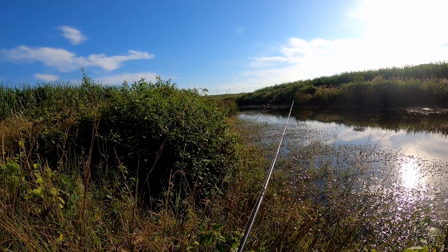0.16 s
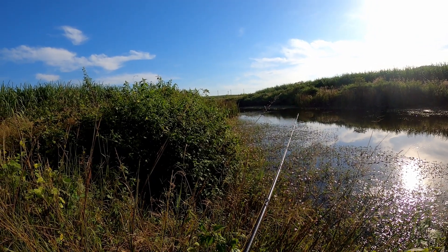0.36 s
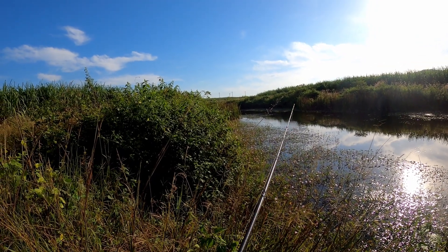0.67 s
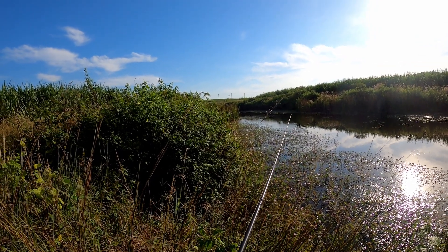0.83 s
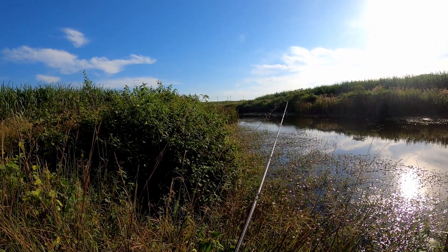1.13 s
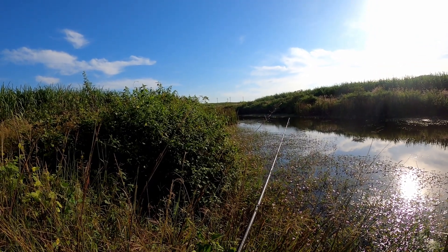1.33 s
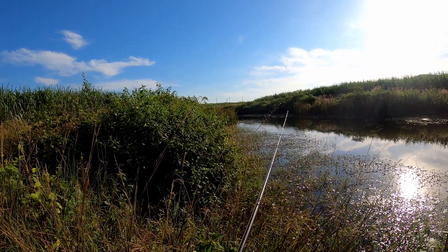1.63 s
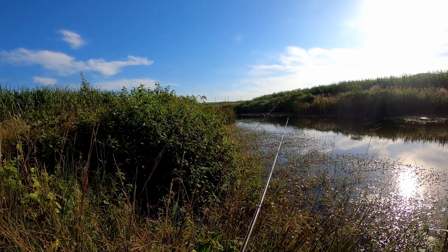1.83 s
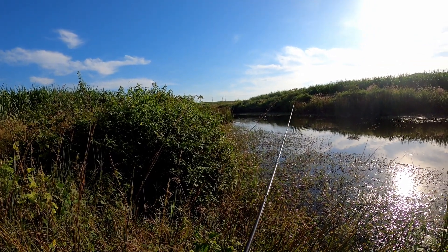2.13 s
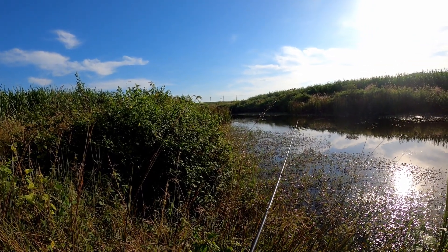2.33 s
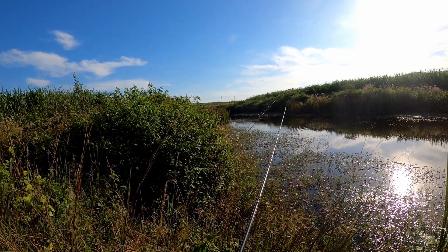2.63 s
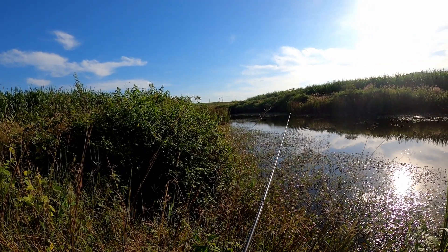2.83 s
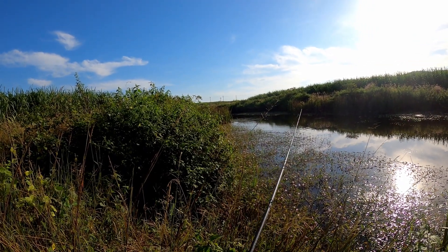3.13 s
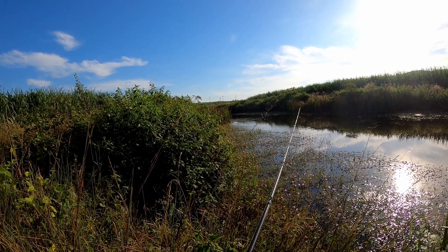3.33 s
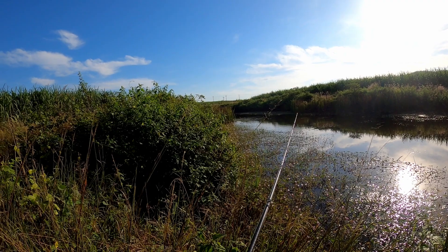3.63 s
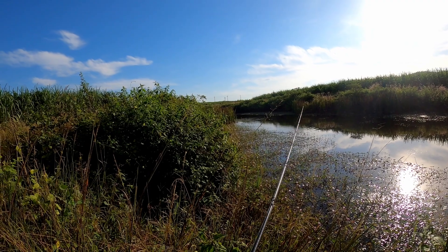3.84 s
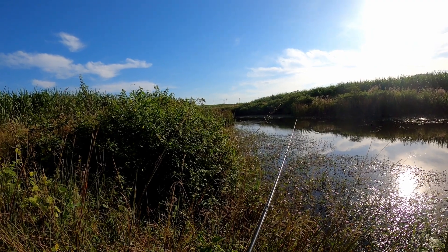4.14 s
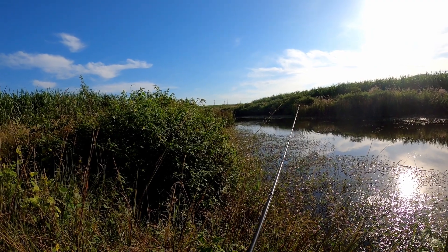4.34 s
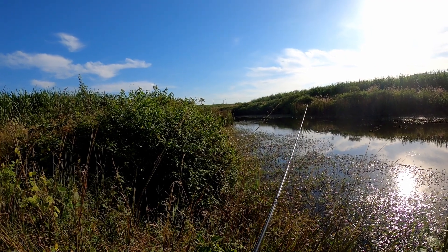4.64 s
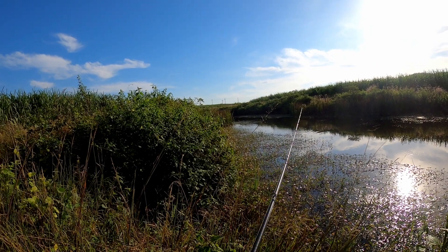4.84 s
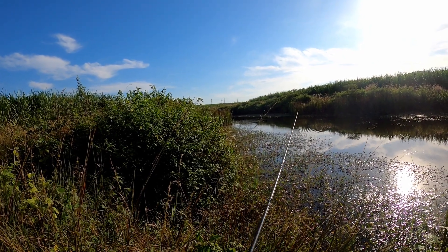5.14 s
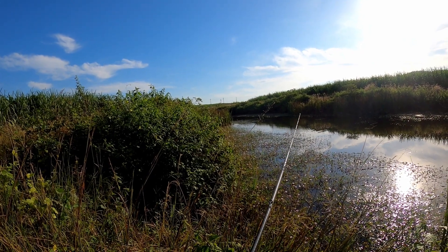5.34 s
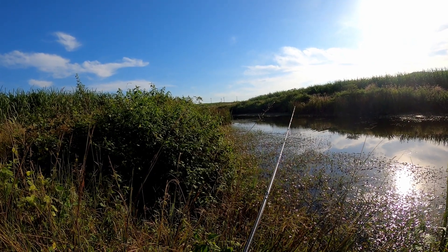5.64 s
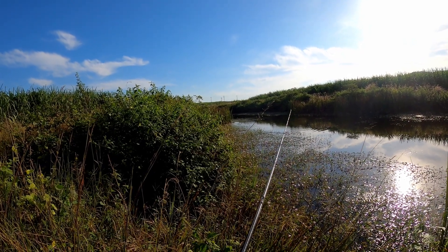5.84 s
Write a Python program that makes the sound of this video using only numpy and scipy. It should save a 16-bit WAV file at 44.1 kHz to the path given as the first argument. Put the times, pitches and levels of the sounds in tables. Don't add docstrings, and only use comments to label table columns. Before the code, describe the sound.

Steady insect chorus in open air: clear mid-high cricket chirps up front, distant answers, faint trills, and very high paired pips mostly to the left. Wind gusts rumble low on the camera microphone and hiss through reeds, with weak breathy tones off a fishing rod. A sharp tick comes near three seconds, a knock near four and a half, then crackling clicks after five.

```python
import sys
import numpy as np
from scipy import signal
from scipy.fft import rfft, irfft
from scipy.io import wavfile
from scipy.ndimage import uniform_filter1d

SR = 44100
rng = np.random.default_rng(int(sys.argv[2]) if len(sys.argv) > 2 else 0)


def transcribe(u):
    v = np.clip(np.atleast_2d(u).T, -1, 1)
    q = np.round(v * 32767).astype(np.int16)
    wavfile.write(sys.argv[1], SR, q)


def boost_factor(decibels):
    exponent = np.asarray(decibels, float) / 20
    return 10 ** exponent


N = 264159

# first_s, last_s, level_db
LOW_NEAR = [
    (0.539, 0.705, -46.5),
    (1.542, 1.705, -47),
    (2.3, 2.458, -48),
    (3.213, 3.367, -48.5),
    (4.135, 4.29, -47),
    (4.941, 5.099, -47),
    (5.955, 5.96, -61),
]
# first_s, last_s, level_db, pitch_hz
LOW_FAR = [(0.039, .04, -50.5, 2986), (0.178, 0.264, -54, 2935), (0.498, 0.575, -51, 3020),
           (0.906, 1.054, -54.5, 3020), (1.018, 1.104, -58, 2940), (1.998, 2.16, -54.5, 3000),
           (2.041, 2.125, -56, 3110), (2.89, 2.89, -60, 3070), (3.03, 3.03, -74, 3050),
           (3.245, 3.245, -49.5, 3020), (3.449, 3.45, -57, 2880), (2.548, 2.768, -54.5, 2983),
           (3.078, 3.153, -53.5, 2990), (3.602, 3.755, -56, 2986), (4.588, 4.836, -54, 2995),
           (4.698, 4.786, -56, 2840), (5.2, 5.354, -53.5, 2980), (5.243, 5.315, -57, 3000),
           (5.714, 5.714, -57, 3010), (5.79, 5.79, -50, 3000), (5.867, 5.867, -49.5, 2990),
           (5.916, 5.916, -61, 3080), (.1, .1, -61, 2790), (1.47, 1.49, -53, 2940), (5.14, 5.14, -54, 3120),
           (2.235, 2.235, -64, 2850)]
# first_s, last_s, gap_s, level_db, pitch_hz
TRILLS = [
    (.248, .69, .0395, -61.5, 3210),
    (1.677, 2.0, .0395, -60.5, 3190),
    (4.916, 5.15, .078, -60, 3160),
    (.332, .85, .043, -69, 4900),
    (3.345, 3.63, .056, -68, 4890),
    (3.813, 4.04, .046, -69, 4900),
]
# first_s, last_s, level_db
HIGH_LEFT = [
    (.106, 7.7, -61.5),
]
# first_s, last_s, level_db
HIGH_FAR_LEFT = [
    (0.751, 2.4, -67),
    (2.985, 3.85, -67.5),
    (4.557, 5.9, -68.5),
]
# first_s, last_s, level_db, pitch_hz
HIGH_AHEAD = [
    (0.025, .55, -65.5, 6780),
    (1.109, 2.13, -64, 6790),
    (2.382, 2.4, -61, 6800),
    (2.683, 2.7, -62, 6850),
    (3.255, 3.3, -61.5, 6800),
    (3.564, 4.34, -65, 6850),
    (4.94, 5, -64, 6830),
    (5.253, 5.8, -67, 6860),
]
# time_s, level_db
RASP_NEAR = [
    (4.197, -60.5),
    (4.247, -53),
    (4.295, -52.5),
    (4.336, -52.5),
    (4.502, -56.5),
    (4.549, -53.5),
    (4.59, -52.5),
]
# first_s, last_s, period_s, level_db, pitch_hz
RASP_FAR = [
    (.02, 1.5, .126, -65, 4450),
    (.057, 1.35, .25, -62, 4400),
    (1.41, 3.3, .2565, -62.5, 4590),
    (1.678, 3.3, .2565, -63, 4230),
    (4.807, 4.87, .0405, -57.5, 4690),
    (4.86, 4.9, .25, -58, 4350),
    (5.084, 5.9, .26, -62.5, 4630),
    (5.415, 5.96, .265, -59.5, 4390),
]
# time_s, rustle_db
WIND = [(0, -65), (.5, -60), (.78, -60), (1.03, -76), (1.3, -59), (1.5, -65.5), (1.95, -72), (2.36, -58.5),
        (2.66, -67), (3.0, -60.5), (3.9, -59.5), (4.2, -64), (4.56, -71), (4.6, -57), (4.75, -60.5),
        (4.9, -56.5), (5.43, -61), (5.7, -60)]
# time_s,
# gain_db
HUSH = [
    (4.2, 0),
    (4.33, -5),
    (4.57, -6),
    (4.585, 0),
]
# start_s, end_s, start_hz, end_hz, level_db
WHISTLE = [(0.084, 0.35, 1300, 1230, -69.5), (0.397, 0.449, 1660, 1700, -65),
           (0.457, 0.557, 1870, 1430, -62.5), (0.564, 0.602, 1496, 1400, -63),
           (0.617, .64, 1820, 1750, -64), (0.647, 0.697, 2190, 2280, -64), (0.734, 0.818, 1907, 1470, -61),
           (0.824, 0.927, 1580, 1400, -67), (1.195, 1.25, 2050, 2100, -69),
           (1.256, 1.371, 1923, 1230, -60.5), (1.39, 1.43, 1620, 1680, -69),
           (1.432, 1.475, 1500, 1350, -65), (1.49, 1.572, 1380, 1400, -70),
           (1.567, 1.682, 1540, 1370, -67.5), (2.209, 2.37, 1343, 1800, -70),
           (2.378, 2.503, 1814, 1060, -65), (2.531, 2.718, 1330, 1570, -70.5),
           (2.713, 2.825, 1726, 1500, -63.5), (2.83, 2.885, 1393, 1620, -66),
           (2.865, 2.949, 1610, 1250, -65), (2.975, 3.044, 1543, 1600, -66),
           (3.061, 3.199, 1470, 2280, -63.5), (3.206, 3.38, 2090, 1870, -68),
           (3.382, 3.47, 2090, 1380, -62.5), (3.467, 3.559, 1434, 2130, -62.5),
           (3.55, 3.597, 2060, 1650, -63.5), (3.602, 3.64, 1950, 1950, -65),
           (3.745, 3.786, 1800, 1880, -62), (3.771, 3.91, 1610, 1600, -64.5),
           (3.908, 4.096, 1600, 1600, -62), (4.1, 4.193, 1470, 1300, -65), (4.197, 4.56, 2310, 2550, -77.5),
           (4.648, 4.8, 1900, 2090, -74), (4.825, 4.864, 2300, 2500, -61), (4.921, 4.982, 2600, 2470, -56),
           (5.04, 5.09, 2150, 1900, -59), (5.122, 5.183, 2340, 2300, -63.5),
           (5.192, 5.243, 2120, 2240, -59.5), (5.25, 5.362, 1843, 1830, -67),
           (5.36, 5.511, 1710, 1520, -67), (5.506, 5.691, 1800, 1990, -63), (5.703, 5.843, 1874, 1840, -67),
           (5.875, 5.926, 1660, 1520, -63.5)]
# pitch_hz, width_hz, level_db
ROD = [(1040, 40, -2), (1180, 40, -5), (1319, 40, -1), (1491, 35, 0), (1647, 30, 3), (1824, 35, 1),
       (1950, 45, -3), (2105, 35, 0), (2332, 28, 0), (2574, 28, 1)]
# time_s, level_db
BUZZ = [
    (0, -66.5),
    (2.05, -63),
    (2.2, -69),
    (3.1, -64),
    (3.6, -62.5),
    (4.7, -61.5),
    (4.8, -65),
    (5.6, -59.5),
    (5.7, -73),
    (5.99, -83),
]
# time_s, snap_db, wood_db, snap_hz
CLICKS = [(.0603, -78, -78, 8500), (.412, -68, -70, 10500), (.4594, -65, -68, 9500),
          (.6749, -72, -70, 8000), (.7467, -64, -70, 11500), (1.5868, -68, -74, 8500),
          (2.9302, -56, -68, 7150), (2.9823, -63, -76, 11800), (3.13, -70, -76, 10300),
          (3.223, -79, -52, 7000), (3.3483, -66, -76, 9200), (3.385, -69, -76, 12500),
          (3.405, -70, -78, 11500), (3.505, -68, -78, 8500), (3.555, -68, -80, 8100),
          (3.707, -71, -72, 12500), (3.913, -74, -76, 9500), (3.93, -67, -68, 9450),
          (4.583, -66, -66, 10000), (4.591, -70, -60, 9000), (4.8464, -64, -66, 8000),
          (4.9392, -67, -68, 11000), (4.9696, -72, -72, 11000), (5.023, -60, -68, 11000),
          (5.056, -69, -57, 12500), (5.077, -74, -47.5, 8000), (5.1078, -70, -74, 9500),
          (5.1277, -67, -68, 9000), (5.24, -72, -70, 10000), (5.3684, -72, -66, 10500),
          (5.382, -75, -70, 9500), (5.393, -78, -60, 8000), (5.4016, -56, -43, 9000),
          (5.408, -74, -47, 7500), (5.4144, -77, -45, 7000), (5.5912, -72, -53, 8500),
          (5.6256, -66, -69, 12500)]
# time_s,
# level_db, pitch_hz
KNOCKS = [(.425, -58, 1040), (4.945, -56, 1060), (4.975, -56, 1010), (2.69, -56, 4200), (1.417, -56, 1350),
          (2.693, -47, 3300), (4.588, -47, 990), (4.589, -53, 2200), (4.595, -49, 1190), (5.078, -58, 1700),
          (5.588, -54, 1300), (5.595, -58, 2900), (2.31, -57, 1150), (3.975, -55, 1400), (5.58, -57, 1050),
          (5.7, -60, 1030), (.68, -61, 1030)]
# pitch_hz, level_db (per Hz)
FLOOR = [(60, -93), (110, -71), (160, -77), (300, -85), (800, -101), (1050, -91.5), (2700, -98),
         (3600, -102), (4500, -90), (5300, -98), (6000, -90.5), (7000, -104), (8500, -105), (11000, -126),
         (15500, -140)]
# pitch_hz, level_db
BUFFET = [(100, -52), (250, 3.5), (400, 13), (600, 6.5), (720, -3), (900, -43)]
# pitch_hz, level_db
RUSTLE = [(700, -32), (900, -14), (1020, -2), (2000, 0), (2700, -3), (3300, -19), (6000, -24), (9000, -42)]
# pitch_hz, level_db
HISS = [(3000, 0), (7000, 0.5), (8600, -3.5), (11000, -32), (13500, -23), (15500, -53)]
# pitch_hz, likeness
SAME = [(50, .985), (130, .75), (210, .55), (450, .8), (800, .7), (1800, .8), (2800, .88), (4400, .75),
        (6000, .6), (8000, .6), (10500, .3), (15000, .2)]
# pitch_hz, lead_rad
LEAD = [(400, -.2), (900, -.5), (2580, -.3), (3270, -1), (5080, -.6), (7410, -8.6), (10000, -12.6),
        (15200, -12)]
# pitch_hz, level_db
TILT = [(60, .1), (130, -1.5), (290, -.8), (640, .5), (1410, 2), (3100, -.3), (6820, .5), (15000, -12)]
# time_s, half_length_s, level_db
GUSTS = [(.3, 0.36, -63.5), (0.715, 0.098, -56), (1.013, 0.19, -56.5), (1.282, 0.11, -50.5),
         (1.94, 0.18, -54), (2.148, 0.24, -61.5), (2.76, 0.15, -64.5), (3.775, 0.04, -48),
         (3.98, 0.27, -53.5), (4.255, 0.049, -45), (4.446, 0.11, -50.5), (5.063, 0.17, -54),
         (5.27, 0.17, -65), (5.718, 0.14, -64.5)]
# time_s, half_length_s, level_db
SHAKES = [(0, 0.086, -50), (0.293, 0.031, -45), (0.66, 0.083, -47.5), (0.973, 0.095, -44.5),
          (1.143, 0.045, -47), (1.32, 0.12, -55.5), (1.682, 0.017, -57), (1.834, 0.034, -48),
          (1.987, 0.047, -55), (2.275, 0.067, -51), (2.465, 0.058, -49), (2.724, 0.16, -49),
          (2.909, 0.051, -45), (3.047, 0.011, -55), (3.277, 0.019, -48), (3.46, 0.24, -58.5),
          (3.736, 0.054, -44.5), (3.984, 0.047, -52), (4.36, 0.15, -47), (4.705, 0.047, -48),
          (4.9, 0.034, -49.5), (5.074, 0.063, -52.5), (5.395, 0.035, -48), (5.498, 0.058, -47.5),
          (5.73, 0.1, -49.5), (5.93, 0.017, -49)]
# time_s, half_length_s, pitch_hz, width_hz, level_db
BRUSHES = [(1.11, .04, 10650, 180, -84), (3.04, .035, 7800, 70, -76), (3.19, .04, 8150, 70, -78),
           (3.18, .04, 8650, 70, -82), (3.08, .012, 15200, 150, -93), (3.15, .03, 3800, 280, -70),
           (4.38, .11, 2370, 70, -71), (4.42, .08, 1200, 120, -72), (4.63, .04, 8500, 900, -78),
           (1.25, .04, 2050, 400, -64), (5.05, .012, 12800, 1500, -83), (2.75, .1, 11500, 1800, -89)]

FRAMES, HZ = N // 256 + 5, np.fft.rfftfreq(1024, 1 / SR)
FRAME_S = np.arange(FRAMES) * 256 / SR
STROKE_GAP_S, SLOWING = .079, 1.025
WARM_UP_S, WARM_UP_DB = .068, -14.5
FIRST_NEAR_DB, FIRST_FAR_DB = -1.2, -5.
AHEAD_GAP_S, AHEAD_FIRST_DB = .254, -3
LEAF_DB, LEAF_SLOPE, HISS_DB = -63, 1.33, -80.5
GUST_EDGE_DB, CALM_DB, STILL_DB = -4.5, -87, -61
PUFF_SHAPE, LULL_DB = .28, -90
LOCK = .7
SNAP_CYCLES = 8


def evened(x):
    return x / np.sqrt(np.mean(x ** 2) + 1e-30)


def smooth(x, size):
    return uniform_filter1d(uniform_filter1d(x, size=size), size=size)


def read(points, hz):
    f, value = np.transpose(points)
    return np.interp(np.log(hz + 1), np.log(f + 1), value)


def curve(rows):
    s, db = np.transpose(rows)
    return np.interp(FRAME_S, s, db)


def layer(shape, level_db):
    return shape / shape.sum(axis=0) * boost_factor(2 * level_db)


def bell(hz, width_hz):
    return np.exp(-.5 * ((HZ[:, None] - hz) / width_hz) ** 2) + 1e-12


def swells(t, rows, floor_db):
    s, half, db = np.transpose(rows)[:, :, None]
    gusts = boost_factor(2 * (db + GUST_EDGE_DB * ((t - s) / half) ** 2))
    return 10 * np.log10(gusts.sum(axis=0) + boost_factor(2 * floor_db))


def rod(hz):
    return .06 + sum(boost_factor(2 * db) / (1 + (2 * (hz - f) / width) ** 2) for f, width, db in ROD)


def at_ports(left, other, hz, lead):
    same = np.clip(read(SAME, hz), -1, 1).reshape(lead.shape)
    return (same * left + np.sqrt(1 - same ** 2) * other) * np.exp(-1j * lead)


def air():
    buffet_db, rustle_db, hush_db = swells(FRAME_S, GUSTS, CALM_DB), curve(WIND), curve(HUSH)
    hiss_db = HISS_DB + LEAF_SLOPE * (rustle_db - LEAF_DB)
    power = boost_factor(2 * read(FLOOR, HZ))[:, None] * SR / 1024
    hushed = (HZ > 900)[:, None] - bell(4350, 350) + 1.9 * bell(1800, 330)
    power = power * boost_factor(2 * hushed * hush_db)
    power += layer(boost_factor(2 * read(BUFFET, HZ))[:, None], buffet_db - 0.5)
    power += layer(boost_factor(2 * read(HISS, HZ))[:, None], hiss_db + 17.5)
    power += layer((boost_factor(2 * read(RUSTLE, HZ)) * (0.24 + rod(HZ)))[:, None], rustle_db + 1.57)
    power += layer(bell(7520, 170), curve(BUZZ))
    power += layer(bell(14340, 32), -99) + layer(bell(10750, 40), -97)
    for s, half, hz, width_hz, db in BRUSHES:
        power += layer(bell(hz, width_hz), db + GUST_EDGE_DB * ((FRAME_S - s) / half) ** 2)
    power += layer(bell(2820, 240), -66 + 0.79 * hush_db)

    a, b, c, d, patches = rng.standard_normal((FRAMES, 513, 5)).T
    patches = evened(uniform_filter1d(uniform_filter1d(patches, size=10, axis=0), size=10, axis=1))
    treble = np.clip(HZ / 8000, 0, 1.6)[:, None]
    flicker = evened(uniform_filter1d(rng.standard_normal(FRAMES), size=5))
    unrest_db = (1.5 + 0.2 * treble) * patches + 0.37 * treble ** 2 * flicker - 5.0
    left = a + 1j * b
    right = at_ports(left, c + 1j * d, HZ, read(LEAD, HZ)[:, None])
    tilt = boost_factor(read(TILT, HZ) / 2)[:, None]
    z = np.array([left * tilt, right / tilt]) * np.sqrt(power) * boost_factor(unrest_db)
    return signal.istft(z, nperseg=1024, noverlap=768)[1][:, :N]


def noise(gain):
    hz = np.fft.rfftfreq(N, 1 / SR)
    a, b, c, d = rng.standard_normal((4, len(hz)))
    left = a + 1j * b
    right = at_ports(left, c + 1j * d, hz, read(LEAD, hz) * (hz > 200))
    return evened(irfft(gain(hz) * np.array([left, right]), N))


def housing(hz):
    modes = .08 / (1 + ((hz - 28) / 10) ** 2) + 1 / (1 + ((hz - 52) / 9) ** 2)
    modes = modes + 0.16 / (1 + ((hz - 79) / 12) ** 2)
    return modes + 0.011 * (hz < 110) * (hz / 110) ** 0.038


def rumble():
    shake = noise(housing)
    size = np.sqrt(smooth((shake ** 2).mean(axis=0), 1500) + 0.28)
    shake = evened(shake / size ** .8)
    push_db = np.interp(np.arange(N) / SR, FRAME_S, swells(FRAME_S, SHAKES, STILL_DB))
    return shake * boost_factor(push_db + 0.78)


def add(mix, s, sound, pan_db, lead):
    at = round(s * SR) - len(sound) // 2
    pan = boost_factor([[pan_db / 2], [-pan_db / 2]])
    turn = np.exp(.5j * np.array([[lead], [-lead]]))
    both = (sound * pan * turn).real
    part = mix[:, max(at, 0):at + len(sound)]
    part += both[:, max(-at, 0):][:, :part.shape[1]]


def stroke(db, hz, length, glide_hz, arch_hz, rough):
    u = np.linspace(-.5, .5, round(length * SR))
    waver = evened(smooth(rng.standard_normal((2, len(u))), 90))
    turns = np.cumsum(hz + glide_hz * u + arch_hz * u ** 2) / SR + rng.random()
    teeth = (1 + rough * (waver[0] + 1j * waver[1])) / np.sqrt(1 + 2 * rough ** 2)
    return boost_factor(db) * np.cos(np.pi * u) ** 1.1 * teeth * np.exp(2j * np.pi * turns)


def rasping_crickets(mix):
    for s, db in RASP_NEAR:
        add(mix, s + 0.0029, stroke(db - 6.5, 4010, 0.054, -150, 300, 0.95), 9., 1.5)
        add(mix, s - .007, stroke(db + 0.5, 4340, 0.025, -150, 1550, 0.64), 9., 1.5)
        add(mix, s + 0.00097, stroke(db + 1.5, 4544, .009, 100, 0., 0.22), 9., 1.5)
    for first, last, period, db, hz in RASP_FAR:
        triplets = np.arange(first, last, period)[:, None] + .042 * np.arange(3)
        for s in triplets.ravel():
            rasp = stroke(db + 1.6 * rng.standard_normal(), hz, .038, -250, 0., .9)
            add(mix, s, rasp, 3.5, -1.3)
            add(mix, s + .019, boost_factor(-15.5) * rasp, .8, -.9)


def high_crickets(mix):
    left = [(s, db, 6480) for a, b, db in HIGH_LEFT for s in np.arange(a, b, .2693)]
    far_left = [(s, db, 6580) for a, b, db in HIGH_FAR_LEFT for s in np.arange(a, b, .2648)]
    ahead = [(s, db + AHEAD_FIRST_DB * (s == a), hz) for a, b, db, hz in HIGH_AHEAD
             for s in np.arange(a, b, AHEAD_GAP_S)]
    singers = [(left, .061, .048, 8., .9), (far_left, .061, .040, 12., 2.7), (ahead, .059, .036, 2.2, .9)]
    for rows, gap, length, pan_db, lead in singers:
        for s, db, hz in rows:
            for at in (s, s + gap):
                song = stroke(db + 0.38 * rng.standard_normal(), hz, length, 14.0, -520, 0.31)
                add(mix, at, song, pan_db, lead)


def burst(first, last, db, first_db):
    u = np.linspace(0, 1, round((last - first) / STROKE_GAP_S) + 1)
    return zip(first + (last - first) * u ** SLOWING, db + first_db * (u == 0))


def low_crickets(mix):
    near = [(s, db, 2835) for row in LOW_NEAR for s, db in burst(*row, FIRST_NEAR_DB)]
    near += [(a - WARM_UP_S, db + WARM_UP_DB, 2860) for a, b, db in LOW_NEAR]
    far = [(s, db - 1.2 + .8 * rng.standard_normal(), hz) for a, b, top_db, hz in LOW_FAR
           for s, db in burst(a, b, top_db, FIRST_FAR_DB)]
    for rows, length, glide_hz, wet_db, rough in ((near, .039, -350, -16., .2), (far, .055, -520, -10., .3)):
        for s, db, hz in rows:
            song = stroke(db, hz, length, glide_hz, 400, rough)
            add(mix, s, song, -1.5, -.6)
            add(mix, s - .003, stroke(db - 15, hz + 150, .034, -200, 0., .3), -1.5, -.6)
            add(mix, s - .024, stroke(db - 20, hz + 320, .03, -200, 0., .3), -1.5, -.6)
            add(mix, s + .018, stroke(db - 9, hz - 30, 0.011, 160, 0., 0.54), -1.5, -.6)
            add(mix, s + 0.019, boost_factor(wet_db) * song, .3, -.3)
            add(mix, s + 0.038, stroke(db - 15.5, hz + 20, .06, -150, 0., 1.4), .3, -.3)


def trillers(mix):
    for first, last, gap, db, hz in TRILLS:
        for s in np.arange(first, last, gap):
            add(mix, s, stroke(db + .7 * rng.standard_normal(), hz, .026, -380, 0., .3), -.6, -1.5)


def ring(db, hz, t60):
    t = np.arange(-1500, 1500) / SR
    rise = (t >= 0) * (1 - np.exp(-abs(t) * hz * 2.5)) ** 2
    return boost_factor(db - 60 * abs(t) / t60) * rise * np.exp(2j * np.pi * hz * t)


def stems():
    dry = np.zeros((2, N))
    for s, snap_db, wood_db, snap_hz in CLICKS:
        spread = rng.uniform(.88, 1.09, size=4)
        s = s + 0.00053
        add(dry, s, ring(snap_db + 21.0, snap_hz, SNAP_CYCLES / snap_hz), -4., 1.6)
        add(dry, s, ring(max(snap_db + 3., wood_db + 1.), 6300 * spread[2], .002), .2, .6)
        add(dry, s, ring(wood_db + 16., 4150 * spread[3], 0.002), 1.5, .3)
        add(dry, s, ring(wood_db - 4.0, 2000 * spread[0], 0.0033), 1.5, -.3)
    for s, db, hz in KNOCKS:
        add(dry, s, ring(db, hz, 35 / hz), .4, -.3)
    return signal.sosfilt(signal.butter(2, 14500, fs=SR, output="sos"), dry)


def whistle():
    start, end, start_hz, end_hz, db = np.transpose(WHISTLE)
    t = np.arange(N) / SR
    hz = np.interp(t, np.ravel([start, end], "F"), np.ravel([start_hz, end_hz], "F"))
    modes = np.array(ROD)[:, 0]
    nearest = modes[abs(hz[:, None] - modes).argmin(axis=1)]
    hz = uniform_filter1d(hz + LOCK * (nearest - hz), size=500)

    size = np.full(N, boost_factor(LULL_DB))
    first, last = np.round(start * SR).astype(int), np.round(end * SR).astype(int)
    for a, b, gain in zip(first, last, boost_factor(db)):
        arch = np.sin(np.linspace(0, np.pi, len(size[a:b]))).clip(0)
        size[a:b] += gain * arch ** PUFF_SHAPE

    turn = np.exp(2j * np.pi * np.cumsum(hz) / SR)
    r = np.exp(-np.pi * 70 / SR)
    slow = noise(np.ones_like) / turn
    for _ in range(2):
        slow = signal.lfilter([1 - r], [1, -r], slow)
    eddies = (turn * slow / (abs(slow) ** 2).mean(axis=0) ** .45).real
    flutter = evened(smooth(rng.standard_normal(N), 550))
    eddies = evened(eddies) * size * boost_factor(1.5 + 1.8 * flutter)
    on_rod = rfft(eddies) * rod(np.fft.rfftfreq(N, 1 / SR)) ** .4
    return irfft(on_rod, N) * boost_factor([[1.2], [-1.2]])


def scene():
    mix = air() + rumble() + stems() + whistle()
    for singers in (rasping_crickets, high_crickets, low_crickets, trillers):
        singers(mix)
    return mix


def top_cut(x):
    return signal.sosfilt(signal.butter(12, 15630, fs=SR, output="sos"), x)


def record(dry):
    lowpass = signal.firwin(255, 15300, fs=SR)
    limited = signal.oaconvolve(dry, lowpass[None], "same")
    return top_cut(limited)


dry = scene()
out = record(dry)
transcribe(out)
```